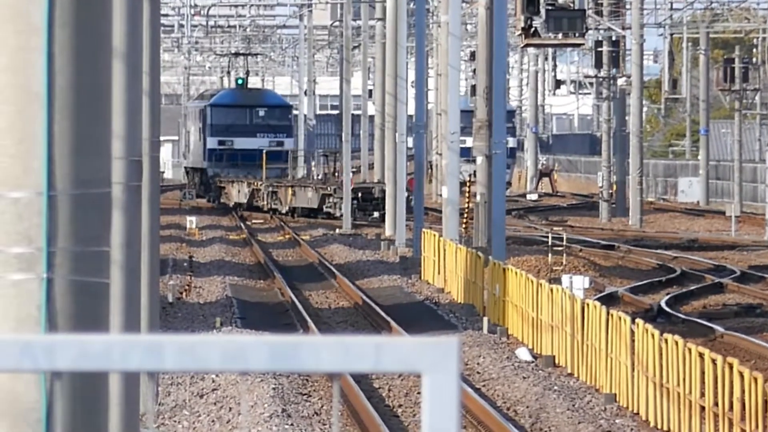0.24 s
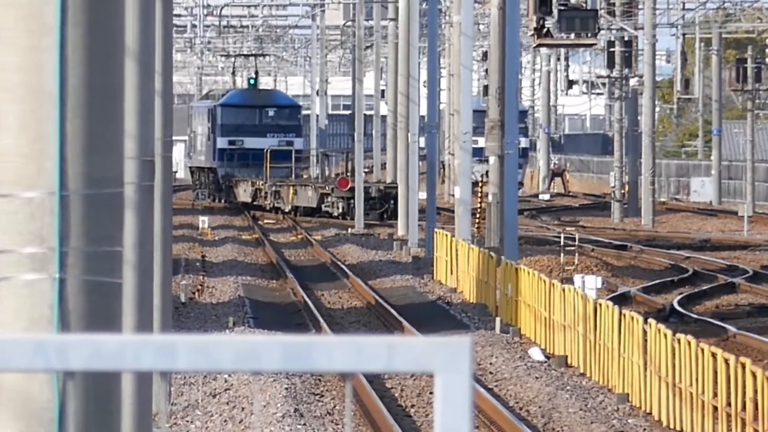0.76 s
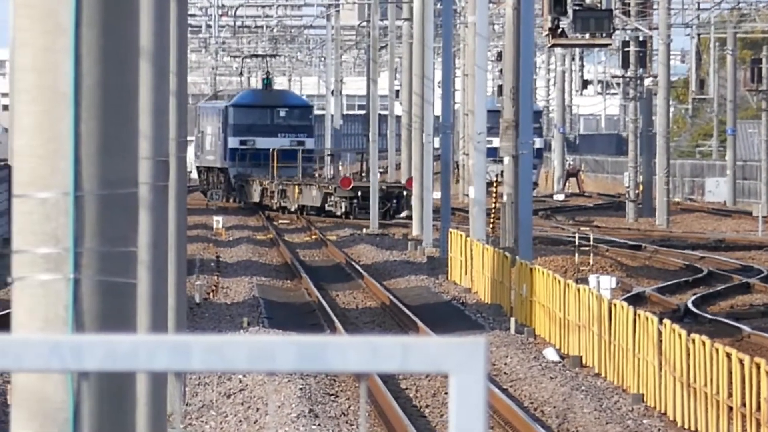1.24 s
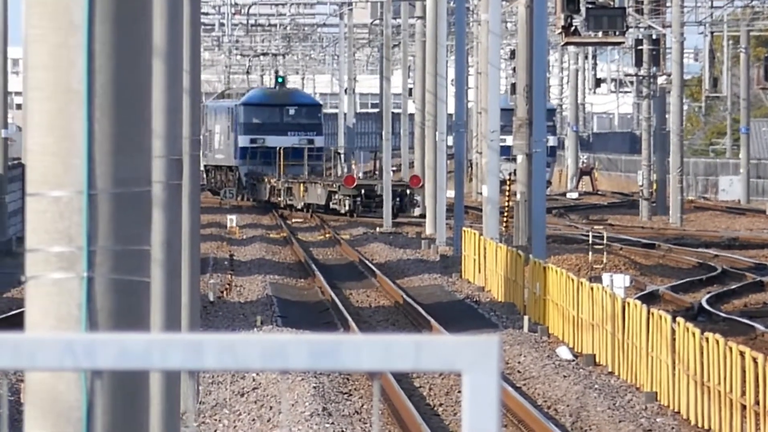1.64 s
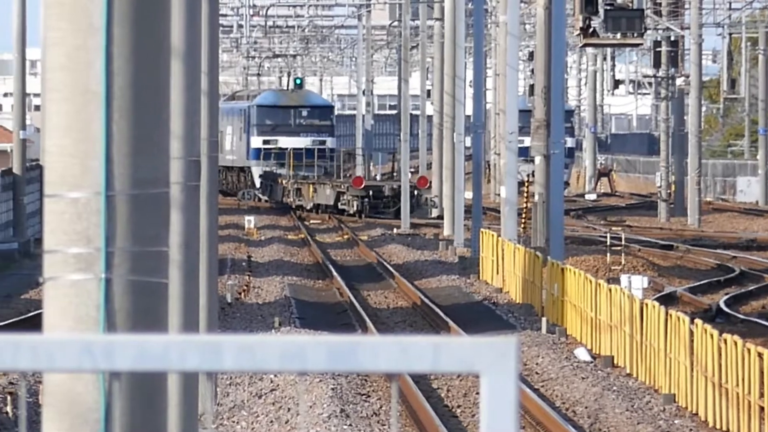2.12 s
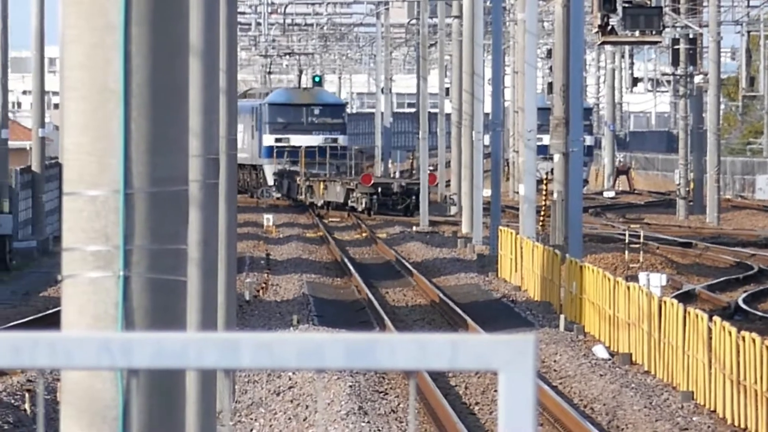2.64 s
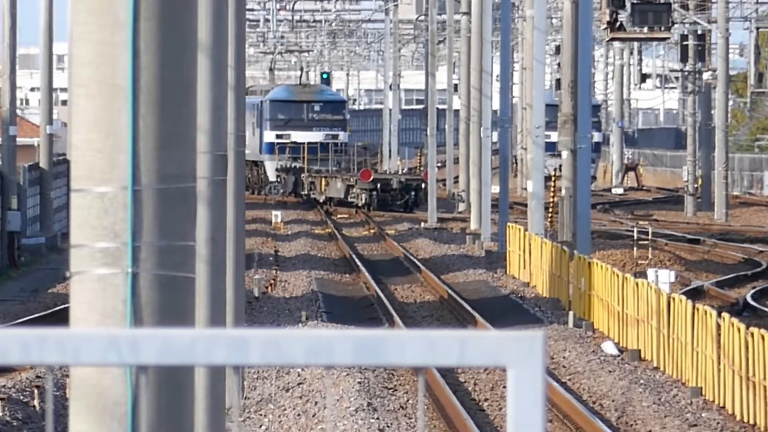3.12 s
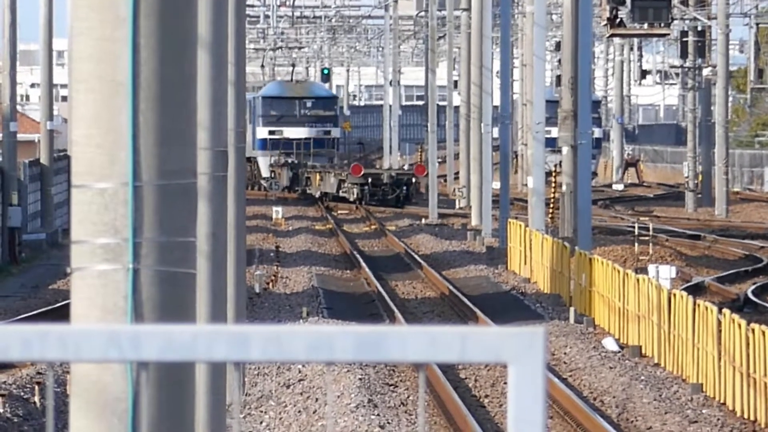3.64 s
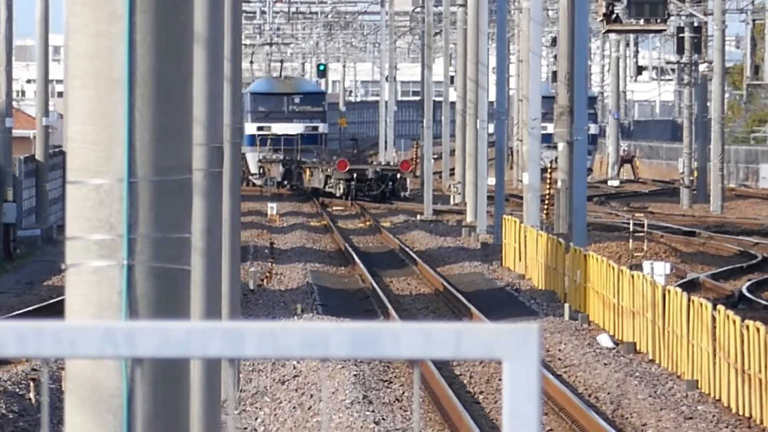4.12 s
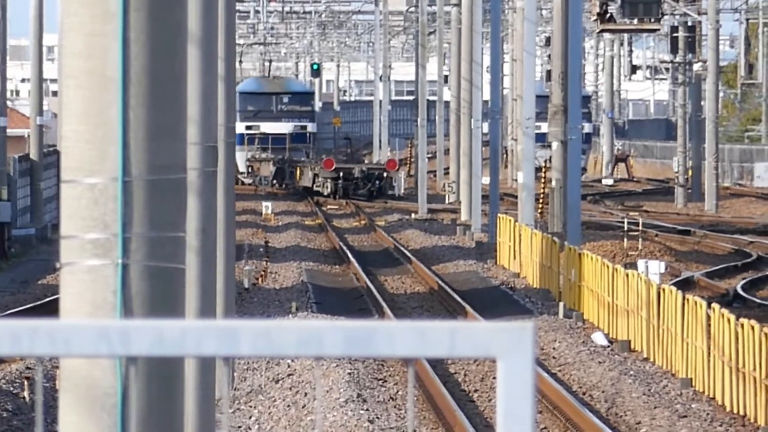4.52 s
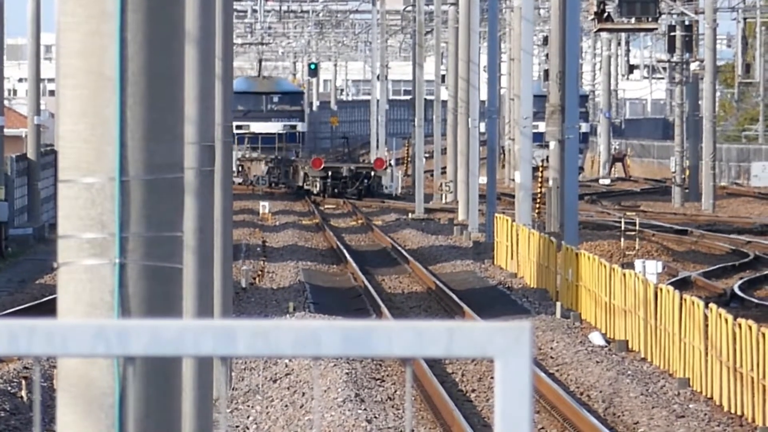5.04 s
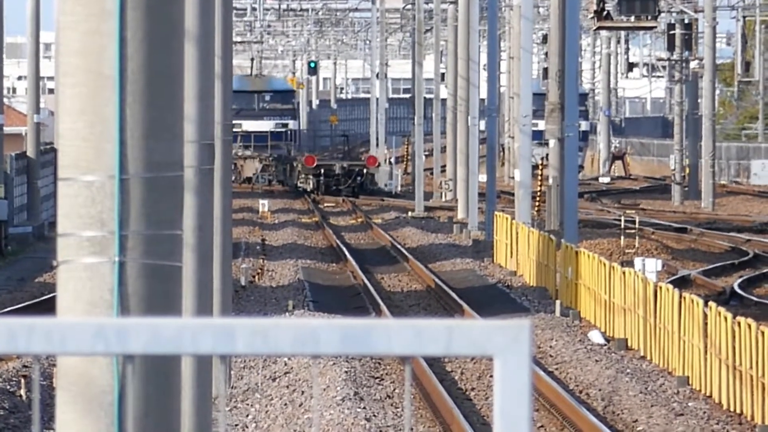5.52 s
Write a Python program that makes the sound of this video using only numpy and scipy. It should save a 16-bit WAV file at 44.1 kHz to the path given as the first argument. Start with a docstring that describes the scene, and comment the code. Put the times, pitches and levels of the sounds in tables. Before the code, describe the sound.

A slow freight train rolls by at some distance in a rail yard, roaring and clanking under a swelling electric motor hum.

```python
"""Slow train in a rail yard

An electric locomotive and flat wagons roll by some way off. Coloured noise makes the roar, rumble,
hiss and yard rush; decaying tones make the rattle and thuds, noise bursts the coupling clanks.
Sines make a motor hum that swells, rises in pitch, drops back and climbs again, with short whines
over a fainter, deeper drone."""
import sys
import numpy as np
from scipy import signal
from scipy.fft import rfft, irfft, next_fast_len
from scipy.io import wavfile
from scipy.ndimage import uniform_filter1d

SR = 44100
rng = np.random.default_rng(int(sys.argv[2]) if len(sys.argv) > 2 else 0)


def wrap_up_sound(samples):
    """Save the sound to the file named by the first command line argument, as 16-bit audio."""
    columns = np.atleast_2d(samples).T
    # keep every value between -1 and 1, then stretch to whole-number steps
    tamed = np.clip(columns, -1, 1)
    steps = np.round(tamed * 32767).astype(np.int16)
    wavfile.write(sys.argv[1], SR, steps)


N = 254456
TIME = np.arange(N) / SR
ROLL_REF_DB = -28  # roar level at which the other rolling levels hold


def undb(db):
    """Decibels to amplitude gain."""
    return 10 ** (np.asarray(db) / 20)


def curves(table):
    """Each column of a timed table, joined by straight lines."""
    s, *columns = np.transpose(table)
    return [np.interp(TIME, s, c) for c in columns]


def walk(rate_hz):
    """Smooth random wandering with a spread near 1, from rate_hz random values per second."""
    k = max(int(SR / rate_hz), 2)
    held = np.repeat(rng.standard_normal(N // k + 2), k)
    smooth = uniform_filter1d(uniform_filter1d(held, k), k)
    return 1.3 * smooth[:N]


def step(s, ease_s):
    """A smooth change from 0 to 1 around a moment."""
    return 0.5 + 0.5 * np.tanh((TIME - s) / (2 * ease_s))


def bumps(events):
    """Sum of Gaussian bumps in dB, one per event."""
    return sum(db * np.exp(-((TIME - s) / half_s) ** 2) for s, half_s, db in events)


def swells(table, attack_s=0.011, release_s=0.013):
    """Gain of swells that rise quickly, hold their level and let go."""
    gain = np.zeros(N)
    for s, length_s, db in table:
        gain += undb(db) * (step(s, attack_s) - step(s + length_s, release_s))
    return gain


def band(x, lo_hz, hi_hz):
    """The part of a sound between two frequencies, without delay."""
    sos = signal.butter(3, [lo_hz, hi_hz], "bandpass", fs=SR, output="sos")
    return signal.sosfiltfilt(sos, x)


def noise(colour):
    """Noise of unit power with the given spectrum, steeply falling beyond its ends."""
    hz, db = np.transpose(colour)
    size = next_fast_len(N, real=True)
    f = np.maximum(np.fft.rfftfreq(size, 1 / SR), 1)
    skirts = np.minimum(f / hz[0], 1) ** 3 * np.minimum(hz[-1] / f, 1) ** 4
    gain = skirts * undb(np.interp(np.log(f), np.log(hz), db))
    y = irfft(rfft(rng.standard_normal(size)) * gain, size)[:N]
    return y / y.std()


def stereo(mid, side, pan_db):
    """Left and right from mid and side; pan_db is left minus right gain."""
    return np.array([(mid + side) * undb(pan_db / 2), (mid - side) * undb(-pan_db / 2)])


def spread(colour, side_db, pan_db):
    """Direct noise, alike in both ears, plus the part that the yard scatters from all sides."""
    side = undb(side_db) * noise(colour)
    return stereo(noise(colour), side, pan_db)


# Rolling roar. Each row: time in seconds, level in dB before ring and rub gains.
ROLL = [(0, -38), (0.45, -34.5), (0.97, -30.5), (1.15, -29), (1.9, -26), (2.6, -27), (3.1, -28.5),
        (3.6, -27.5), (4.1, -29), (4.55, -29), (4.78, -31), (5.35, -29.5), (5.48, -30), (5.6, -28.5),
        (5.77, -28.5)]
# Flange rubs. Each row: centre in seconds, half length in seconds, gain in dB.
RUBS = [(1.5, 0.19, 3), (2.0, 0.15, 2), (2.085, 0.06, 3.2), (3.27, 0.28, 1.7), (3.8, 0.2, 3.2),
        (4.42, 0.035, 2.5), (4.56, 0.05, 2.2)]
# Bogie load changes, mostly booms. Each row: centre in seconds, half length in seconds, gain in dB.
BOOMS = [(0.72, 0.11, 3), (1.18, 0.21, 3.5), (1.71, 0.081, 2), (1.97, 0.12, 2), (2.3, 0.17, -1),
         (3.93, 0.045, 2), (4.52, 0.14, 2.5), (5.25, 0.06, 2.5)]
# Wheel and rail resonances. Each row: centre in seconds, half length in seconds, centre in Hz,
# width in Hz, gain in dB.
RINGS = [(0.38, 0.3, 700, 170, 6.5), (0.603, 1, 2340, 1280, 3.5), (1.85, 0.12, 1070, 111, 3.5),
         (2.5, 0.28, 1320, 139, 4.5), (2.95, 0.16, 1040, 90, 3), (3.25, 0.12, 1190, 98.5, 7),
         (3.754, 0.15, 924.4, 80, 3), (4.27, 0.17, 1090, 89.96, 2.5), (5.45, 0.27, 1160, 200.8, 2.5)]
# Spectra of roar, body, rumble and hiss. Each row: frequency in Hz, relative density in dB.
ROAR_COLOUR = [(350, -25), (620, -1), (780, -3), (940, -0.5), (1060, 1), (1180, -1.5), (1310, -3),
               (1430, -5.5), (1800, -8), (2300, -14), (2820, -22), (2950, -34), (4000, -49.5)]
BODY_COLOUR = [(130, -28.5), (200, -1.5), (250, -1.5), (300, 0), (345, -0.5), (420, -4.5), (490, -3),
               (600, -12.5), (900, -19.5)]
RUMBLE_COLOUR = [(22, -43.5), (36, -36.5), (58, -18.5), (85, -7.5), (110, -2), (160, -1), (215, 0),
                 (270, -3.5), (400, -18.5)]
HISS_COLOUR = [(2000, -14.5), (3000, 1.5), (3300, -1), (4000, -8), (4900, -10.5), (5700, -19), (6400, -16),
               (8100, -26), (9000, -21.5), (10300, -23.5), (13000, -32), (15000, -33.5)]


def rolling():
    """Rough wheels on rough rails shake the wagons, ring the bogies and make the rails roar and hiss."""
    roll_db, = curves(ROLL)
    effort_db = roll_db - ROLL_REF_DB
    # a rubbing flange sticks and slips, so its surge is rough
    rub_db = bumps(RUBS) * (1 + 0.43 * walk(160))
    # left towards centre, left minus right; each part takes its own share
    pan_start_db, pan_end_db = 6, 0.5
    pan_db = pan_start_db + (pan_end_db - pan_start_db) * step(3.56, ease_s=0.7)

    roar = spread(ROAR_COLOUR, side_db=-8.5, pan_db=0.068 * pan_db)
    # the middle of the roar is the most directional
    core = band(roar, lo_hz=834, hi_hz=2160)
    core_pan_db = 0.97 * np.array([pan_db, -pan_db]) / 2
    roar = roar + core * (undb(core_pan_db) - 1)
    for s, half_s, hz, width_hz, db in RINGS:
        ring_db = bumps([(s, half_s, db)])
        roar = roar + band(roar, hz - width_hz / 2, hz + width_hz / 2) * (undb(ring_db) - 1)
    # harder rolling and rubbing flanges lift the upper roar
    bright_db = 0.4 * effort_db + 0.56 * rub_db
    roar = roar + band(roar, lo_hz=1670, hi_hz=3400) * (undb(bright_db) - 1)
    roar = roar * undb(roll_db + 0.44 * walk(28.07))

    # slopes: dB gained per dB of roar
    body_db = -29 + 0.84 * effort_db + bumps(BOOMS) + 0.4 * walk(24)
    body = spread(BODY_COLOUR, side_db=-12.5, pan_db=0.16 * pan_db) * undb(body_db)

    # from the points on, the wagons shake harder
    points_db = 7.5 * step(4.4, ease_s=0.05)
    rumble_db = -40.5 + 0.67 * effort_db + points_db + 3.5 * walk(18)
    rumble = spread(RUMBLE_COLOUR, side_db=-12.0, pan_db=-2.5) * undb(rumble_db)

    hiss_db = -56 + 1.5 * effort_db + rub_db + 0.6 * walk(40)
    hiss = spread(HISS_COLOUR, side_db=-5.5, pan_db=0.37 * pan_db) * undb(hiss_db)
    return roar + body + rumble + hiss


# Deep rumble spectrum. Each row: frequency in Hz, relative density in dB.
GROUND_COLOUR = [(20, -18), (32, -18), (45, -9), (58, 1), (80, -1.5), (120, -13.5)]


def ground(level_db=-58.0, swell_db=0.5, shudder_db=-36, hz=145, width_hz=70):
    """The train's weight makes a deep rumble that never stops; a bogie shudders through the points."""
    deep = spread(GROUND_COLOUR, side_db=-8.5, pan_db=-3.0) * undb(level_db + swell_db * walk(7.8))
    shudder = band(rng.standard_normal(N), hz - width_hz / 2, hz + width_hz / 2)
    gate = step(5.28, ease_s=0.03) - step(5.52, ease_s=0.025)
    return deep + shudder / shudder.std() * undb(shudder_db) * gate


def rattle(level_db=-37.5, scatter_db=4, lo_hz=550, hi_hz=2100, t60_s=0.07, pan_db=3.5, count=150):
    """Loose chains and brake gear tap at random, each at its own pitch, harder as the roar grows."""
    out = np.zeros((2, N))
    roll_db, = curves(ROLL)
    age = np.arange(SR // 8) / SR
    for when, pitch, size, place in rng.random((count, 4)):
        start = int(when * (N - len(age)))
        hz = lo_hz * (hi_hz / lo_hz) ** pitch
        ring = np.sin(2 * np.pi * hz * age) + 0.5 * np.sin(2 * np.pi * hz * 1.19 * age)
        ring = ring * (1 - np.exp(-(age * hz) ** 2))
        tap_db = level_db + roll_db[start] - ROLL_REF_DB - scatter_db * np.log(1 - 0.95 * size)
        ear_db = pan_db * place * np.array([[1], [-1]])
        out[:, start:start + len(age)] += ring * undb(tap_db - 60 * age / t60_s + ear_db)
    return out


# Yard rush spectrum. Each row: frequency in Hz, relative density in dB.
YARD_COLOUR = [(120, -5.5), (320, -4), (520, 2), (720, -3), (900, -5.5), (1500, -19), (2700, -16.5),
               (3200, -47.5), (5400, -61.5), (8000, -60), (10000, -43.5), (15000, -52)]


def yard(level_db=-41):
    """The steady rush of the yard and town, with a trace of fine hiss."""
    return spread(YARD_COLOUR, side_db=-5.5, pan_db=0.0) * undb(level_db + 0.55 * walk(12.0))


# Deep drone. Each row: time in seconds, pitch in Hz, RMS level of the fundamental in dB.
DRONE = [(0, 51, -63), (1.2, 57.2, -48.5), (2.2, 64.1, -56.5), (2.5, 66.3, -48), (2.95, 69.2, -49),
         (3.4, 71.4, -61), (3.65, 70.1, -46.5), (4.0, 72, -54.5), (4.3, 70.9, -45.5), (4.8, 60.05, -59),
         (5.1, 57.9, -45.5), (5.77, 57.73, -52)]


def drone(octave_db=8.0, fifth_db=3.5, change_s=2.8, waver_db=1.5):
    """A deeper machine tone; part way through, its octave gives way to the fifth."""
    hz, db = curves(DRONE)
    phase = 2 * np.pi * np.cumsum(hz * (1 + 0.0063 * walk(8))) / SR
    late = step(change_s, ease_s=0.073)
    octave = (1 - late) * undb(octave_db) * np.sin(2 * phase)
    fifth = late * undb(fifth_db) * np.sin(1.5 * phase)
    return np.sqrt(2) * undb(db + waver_db * walk(6.0)) * (np.sin(phase) + octave + fifth)


# Motor speed. Each row: time in seconds, mean hum pitch in Hz.
PITCH = [(0, 197.5), (0.65, 209.9), (0.82, 216.5), (1.1, 229), (1.42, 242.2), (1.65, 255.9), (1.85, 267.2),
         (1.98, 269.8), (2.07, 262), (2.16, 255), (2.3, 251), (2.72, 201.4), (2.98, 196.8), (3.17, 190.2),
         (3.55, 200.6), (3.95, 205.9), (4.35, 216.9), (4.8, 205.8), (5.77, 205.2)]
# Hum swells. Each row: start in seconds, length in seconds, level in dB.
HUM = [(0.36, 0.29, -37), (0.65, 0.094, -32.5), (0.78, 0.155, -25), (1.03, 0.13, -28), (1.17, 0.11, -27),
       (1.355, 0.088, -22.5), (1.535, 0.1, -24.5), (1.65, 0.063, -26), (1.71, 0.17, -22.5),
       (2.025, 0.083, -23), (2.25, 0.12, -32.5), (2.47, 0.045, -33), (2.7, 0.15, -31.5),
       (2.85, 0.15, -25.5), (3.0, 0.26, -26.5), (3.26, 0.2, -34.5), (3.485, 0.1, -21), (3.595, 0.07, -25),
       (3.665, 0.08, -19.5), (3.745, 0.06, -27.5), (3.805, 0.073, -34), (3.885, 0.11, -28),
       (4.15, 0.12, -34), (4.3, 0.17, -30), (4.81, 0.32, -37.5), (5.3, 0.56, -42)]
# Swells an octave below. Each row: start in seconds, length in seconds, level in dB.
LOW_HUM = [(0, 0.52, -48), (0.63, 0.067, -44.5), (0.8, 0.15, -38.5), (1.07, 0.13, -36.5), (1.22, 0.14, -42),
           (1.46, 0.16, -37.5), (1.61, 0.11, -32), (1.735, 0.07, -29), (1.89, 0.058, -26),
           (1.965, 0.06, -28.5), (2.078, 0.092, -23), (2.175, 0.095, -24), (2.26, 0.068, -29),
           (2.33, 0.33, -42.5), (4.09, 0.16, -38.5)]
# Weak overtones. Each row: multiple of the hum pitch, mean level in dB relative to the load.
OVERTONES = [(0.751, -28), (1.25, -18), (1.5, -11.5), (1.75, -16), (2, -14), (2.25, -16)]


def motor(waver=0.009, side_db=-15, pan_db=-1.2, fray_rad=0.7, rest_db=-49, rough=0.13):
    """A hum that comes in swells, with its lower octave and weak overtones, all locked to one shaft."""
    hz, = curves(PITCH)
    hum = (swells(HUM) + undb(rest_db)) * undb(0.86 * walk(34))
    low = swells(LOW_HUM) * undb(0.5 * walk(20))
    phase = 2 * np.pi * np.cumsum(hz * (1 + waver * walk(24.05))) / SR
    # uneven running roughens the hum while it sounds
    unevenness = rough * (walk(90) * np.sin(phase) + walk(90) * np.cos(phase))
    mid = hum * (np.sin(phase) + unevenness) + low * np.sin(phase / 2)
    # overtones follow the load averaged over 0.5 s; each fades and frays on its own path
    load = uniform_filter1d(np.sqrt(hum * (low + undb(rest_db))), SR // 2)
    for multiple, db in OVERTONES:
        tone = np.sin(multiple * phase + fray_rad * walk(18))
        mid = mid + load * undb(db + 2.2 * walk(6.1)) * tone
    # reflections reach the two ears with wandering strength
    echo = walk(6.4) * np.sin(phase) + walk(4.5) * np.cos(phase)
    echo = echo + 0.6 * walk(6.5) * np.cos(phase / 2)
    side = undb(side_db) * load * echo
    return np.sqrt(2) * stereo(mid, side, pan_db)


# Short whines. Each row: start in seconds, length in seconds, mean pitch in Hz, level in dB.
WHINE = [(0.634, 0.27, 323.4, -34.5), (0.98, 0.12, 332.3, -33.5), (1.14, 0.1, 342, -30.5),
         (1.45, 0.063, 358.4, -31.5), (1.64, 0.13, 389.3, -30), (1.84, 0.2, 356, -34.5),
         (2.1, 0.072, 367, -31), (2.48, 0.072, 333, -35), (2.82, 0.11, 344, -35.5), (3.9, 0.082, 300, -32),
         (4.408, 0.24, 323, -33.5), (5.18, 0.089, 352.6, -35)]


def whine(waver=0.01193, flutter_db=1.2):
    """Brief, unsteady machine tones half buried in the roar."""
    cycles_per_hz = np.cumsum(1 + waver * walk(16)) / SR
    tones = np.zeros(N)
    for s, length_s, hz, db in WHINE:
        tones += swells([(s, length_s, db)]) * np.sin(2 * np.pi * hz * cycles_per_hz)
    return np.sqrt(2) * undb(flutter_db * walk(13)) * tones


# Light clanks of the couplings. Each row: start in seconds, level of the smeared burst in dB.
CLANKS = [(1.206, -35), (1.79, -33), (2.164, -31.5), (2.312, -29.5), (2.397, -37), (2.875, -28.5),
          (3.3, -27), (3.365, -30), (4.879, -25.5), (5.71, -36)]
# Clank spectrum. Each row: frequency in Hz, relative density in dB.
CLANK_COLOUR = [(400, -9), (900, -7), (1050, 6.5), (1400, -12.5), (2600, -29.5), (5000, -48)]


def clanks(t60_s=0.39, rise_s=0.001, strike_db=4, strike_t60_s=0.02):
    """Distant steel knocks: a brief strike, smeared by the yard into a short burst."""
    strength = np.zeros(N)
    for s, db in CLANKS:
        age = np.maximum(TIME - s, 0)
        rise = 1 - np.exp(-(age / rise_s) ** 2)
        decay = undb(-60 * age / t60_s) + undb(strike_db - 60 * age / strike_t60_s)
        strength += rise * undb(db) * decay
    return strength * spread(CLANK_COLOUR, side_db=-12.5, pan_db=4.0)


# Wheels dropping over rail gaps. Each row: start in seconds, relative level in dB, pitch in Hz.
THUDS = [(4.344, -21, 213), (4.405, -19, 214), (4.422, -15, 196), (4.43, -19, 115), (4.526, -21, 140),
         (4.578, -19.5, 257), (4.588, -17, 112), (4.675, -23, 131), (4.699, -14, 122), (4.742, -21, 141),
         (4.757, -18, 202), (4.809, -19.5, 225), (4.835, -17.5, 112), (4.915, -24, 110), (5.15, -22, 110.2),
         (5.359, -16, 170), (5.461, -12, 243.2), (5.498, -18, 157.5)]
# Wagon frame modes. Each row: multiple of the thud pitch, relative level in dB, t60 in seconds.
WAGON_MODES = [(.7, -15.5, 0.099), (1, 2.5, 0.075), (1.3, -8.5, .08)]


def thuds(contact_s=0.007, gain_db=3.2):
    """Each wheel drop pushes softly on a wagon frame, which rings briefly."""
    out = np.zeros(N)
    for s, db, hz in THUDS:
        start = int(s * SR)
        age = np.maximum(TIME[start:][:SR // 3] - s, 0)
        ring = np.zeros(len(age))
        for ratio, mode_db, t60_s in WAGON_MODES:
            ring += undb(mode_db - 60 * age / t60_s) * np.sin(2 * np.pi * hz * ratio * age)
        push = 1 - np.exp(-(age / contact_s) ** 2)
        out[start:][:len(age)] += undb(db + gain_db) * push * ring
    return out


def scene():
    """The train, the machine tones and the yard together."""
    train = rolling() + ground() + rattle() + clanks() + thuds()
    return train + motor() + drone() + whine() + yard()


def record(dry, lo_hz=4700, hi_hz=8200, cancel=0.39, widen=0.45, bass_hz=42, top_hz=15150):
    """Opposed microphone ports weaken the low treble's mid and widen its sides; bass and top are cut."""
    dry = dry * np.minimum(TIME / 0.004, 1)  # 4 ms fade-in
    treble = band(dry, lo_hz, hi_hz)
    mid = treble.mean(axis=0)
    heard = dry - cancel * mid + widen * (treble - mid)
    heard = signal.sosfilt(signal.butter(2, bass_hz, "highpass", fs=SR, output="sos"), heard)
    return signal.sosfilt(signal.ellip(10, 0.2, 70, top_hz, fs=SR, output="sos"), heard)


dry = scene()
out = record(dry)
wrap_up_sound(out)
```